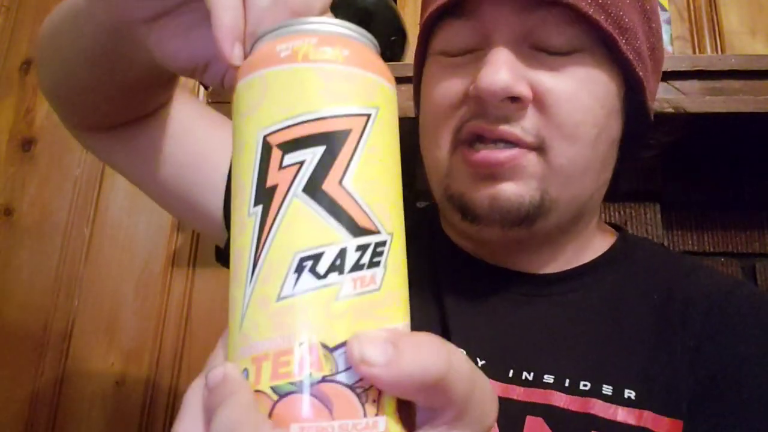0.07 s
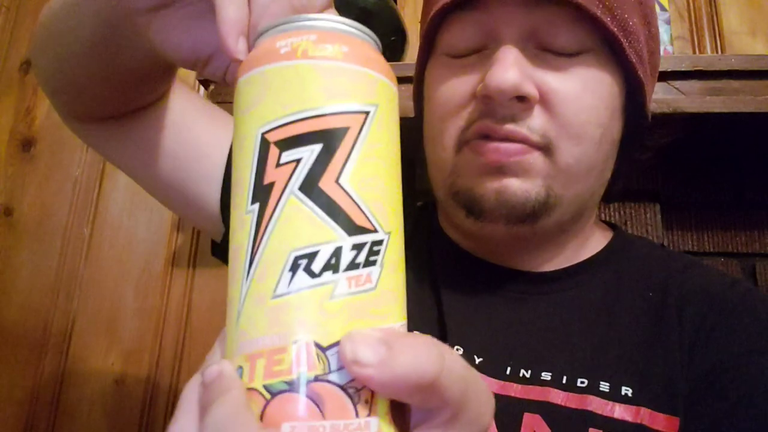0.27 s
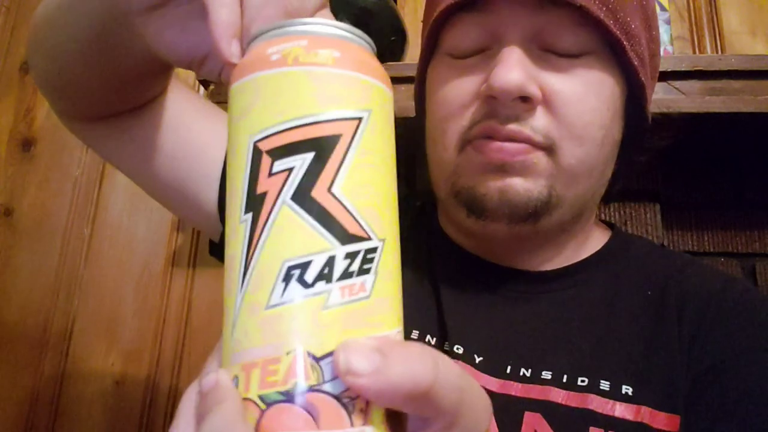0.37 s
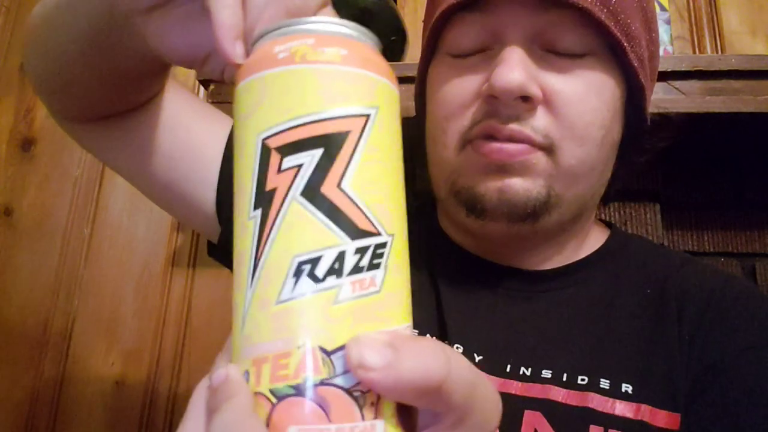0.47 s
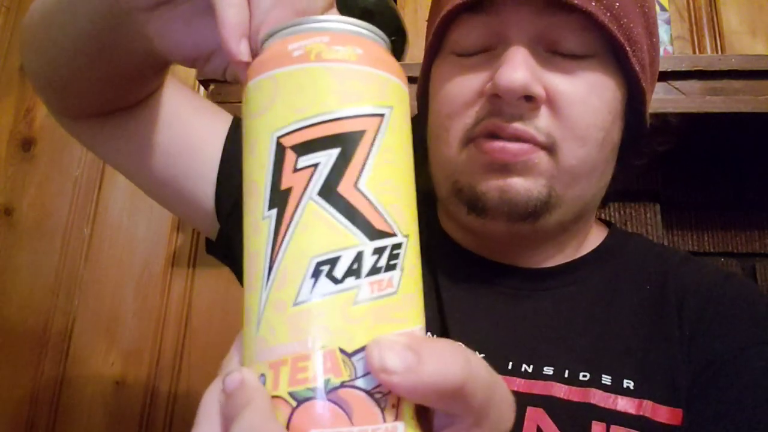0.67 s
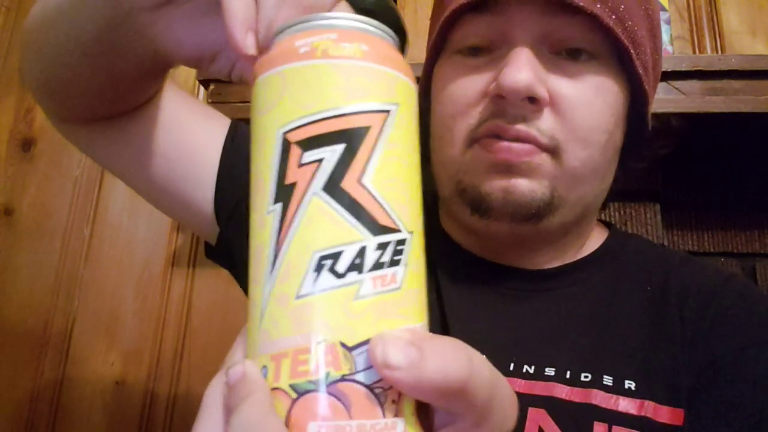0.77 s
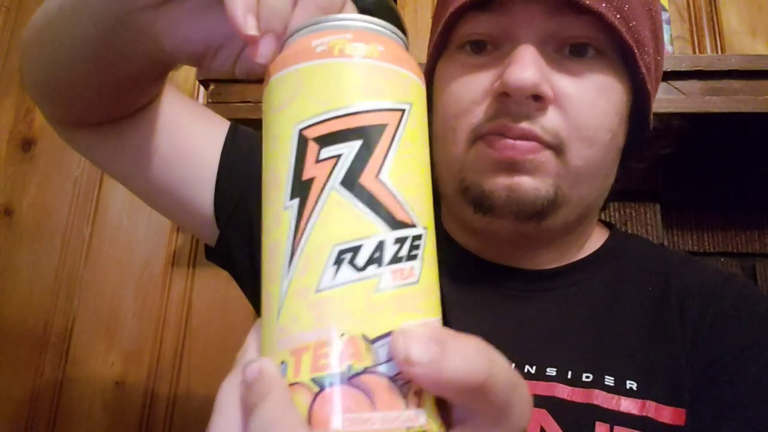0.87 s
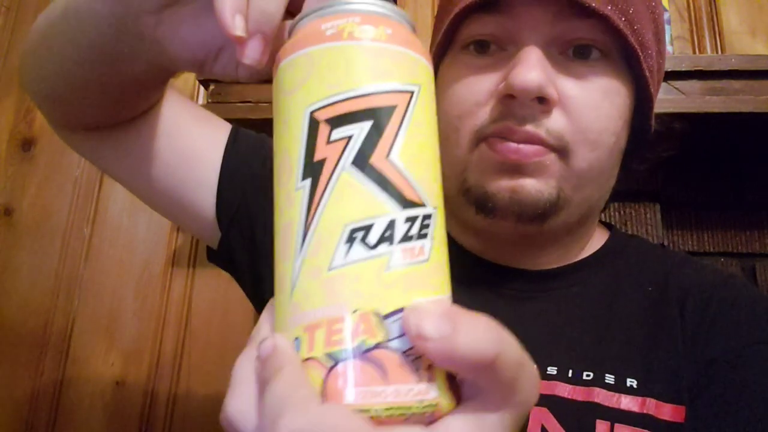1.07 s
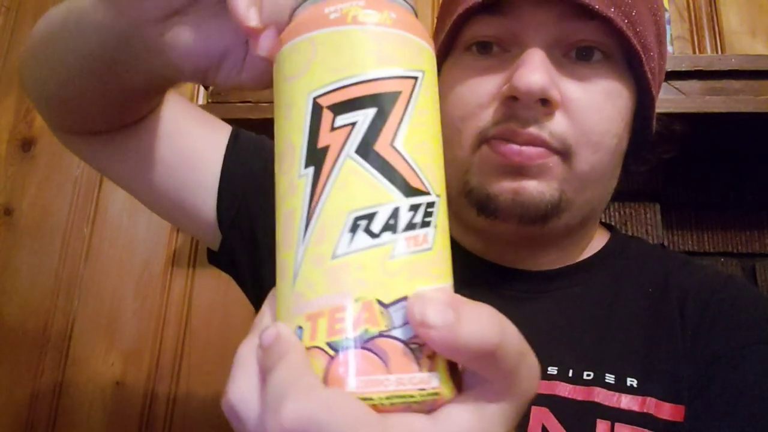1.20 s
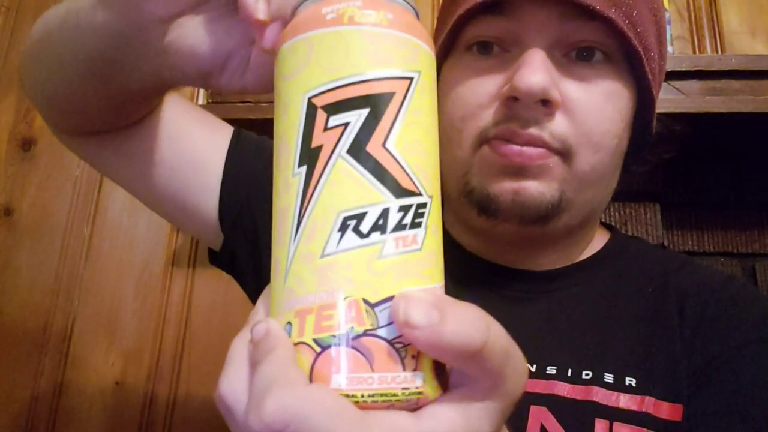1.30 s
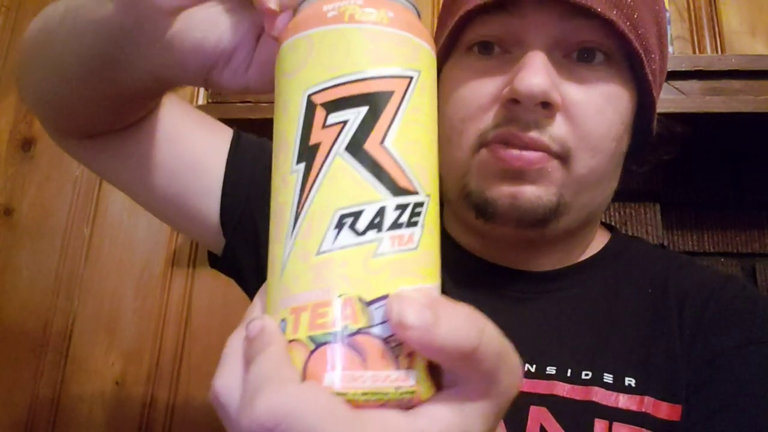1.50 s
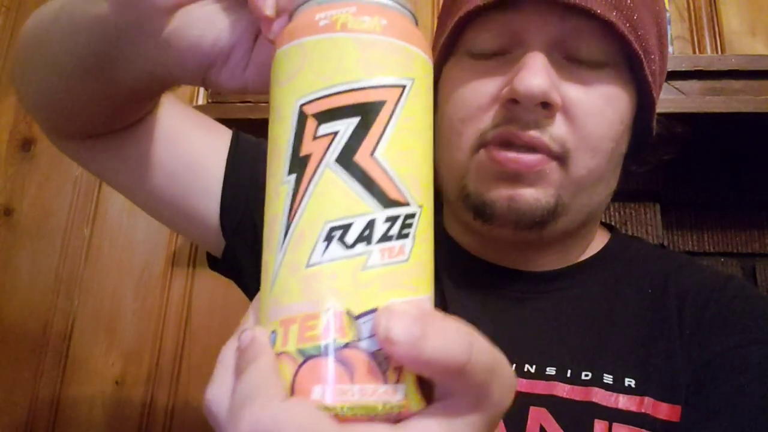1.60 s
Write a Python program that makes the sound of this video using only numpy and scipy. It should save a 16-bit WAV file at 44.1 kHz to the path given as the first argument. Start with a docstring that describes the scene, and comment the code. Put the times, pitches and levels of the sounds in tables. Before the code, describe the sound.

A fingernail flicks the metal pull tab of a full drink can close to stereo microphones: one bright, hard snap almost at once, a tiny tick, then a softer double click near the end, in a small quiet wooden room.

```python
"""The metal pull tab of a full drink can, flicked by a fingernail, snaps close to two microphones in a small wooden room.
Each snap is a sharp impulse plus a brief noisy chatter of the tab on the lid, with the ringing of can and tab.
Delayed copies make the echoes of near surfaces and walls; fading noise makes a room tail of about a third of a second.
The left microphone favours 5 kHz, the right one 13 kHz. A faint whistle, a wavering low hum and room noise lie below,
all made of filtered noise."""
import sys
import numpy as np
from scipy import signal
from scipy.fft import rfft, irfft
from scipy.io import wavfile
from scipy.ndimage import uniform_filter1d

SR = 44100
rng = np.random.default_rng(int(sys.argv[2]) if len(sys.argv) > 2 else 0)


def how_loud(loudness_db):
    """Turn decibels into a plain amplitude multiplier (0 dB gives 1, 20 dB gives 10)."""
    steps = np.asarray(loudness_db, float) / 20
    return 10 ** steps


def master(y):
    """Save y as 16-bit WAV."""
    cut = np.clip(np.atleast_2d(y).T, -1, 1)
    pcm = np.round(cut * 32767)  # scale
    wavfile.write(sys.argv[1], SR, pcm.astype(np.int16))


N = 72765   # length of the sound [samples]

# pitches at which the colour of each snap is given: (frequency [Hz])
SNAP_HZ = [750, 1500, 3000, 5500, 9000, 13000, 15500]
# snaps of the tab, levels before the common gain:
# (time [s], level [dB], seven colours at SNAP_HZ [dB], chatter [dB], can ring [dB], room tail [dB])
SNAPS = [(0.0185, -59.5, -6, 5, 18, 2.5, -20, -26, -19, -15, -10, 4),
         (0.1896, -27.5, 0, 13.5, 1.5, -2, -1, -13.5, -27, -3.5, -6.5, -13),
         (0.2034, -3, -10, -17.5, -13, -13.5, 2, -1, -4.5, 0.5, -9, 0),
         (0.2038, -1, -1.5, 1, -1.5, 0, -11.5, -21.5, -20, -9.5, -25, -1.5),
         (0.2044, -14.5, -3.5, 0.5, 0, -5.5, -1, 0, 0, -6, -26, -22),
         (.6295, -67, 0, -3.5, 5, 9, -16, -25, -25, -1, -18, 10.5),
         (.8135, -22, 16.5, 7, 8, -8.5, -5, -28.5, -26, 2.5, -29.5, 1),
         (1.0178, -61, 15, 33, 2, -15, -15, -25.5, -24.5, -14.5, -30, 16),
         (1.4772, -60, -1, -5.5, 1.5, 1.5, 8, 6, 16, 1, -30.5, 6.5),
         (1.5293, -64, 0, 7.5, 0, 3, 0, -23, -25, -8, -30, 4),
         (1.5808, -64.5, 5.5, -4.5, 20, 4, 2, -10, -17, -12, -35, -12),
         (1.5940, -22.5, 3, 1.5, 7, -0.5, 10.5, -10, -5, 1, -36, 4),
         (1.5952, -24, 4, 10, 4, -4.5, 10, -4, -16, -8, -30, -5),
         (1.5995, -36, 4, 13, -1, 0, 10, -3, -12, -15, -8, -4),
         (1.6006, -34, 11, 6, -3, 3, 6, -10, -10, -4.5, 0, 1)]
# ringing of can and tab: (frequency [Hz], relative level [dB], time to fall by 60 dB [s])
CAN_RINGS = [(746.6, -28, .08), (800, -28, .06), (1660, -25.5, 0.013), (4456, -22, 0.025), (4600, -23, .03),
             (4950, -24, .03)]
# colour of each microphone: (frequency [Hz], left [dB], right [dB])
MICS = [(198.1, -49, -57.5), (700, -25, -40), (1360, -24.5, -39.5), (2200, -21, -36), (3020, -15.5, -27.5),
        (3850, -7, -20.5), (4920, -1.5, -15.5), (5300, 4, -20.5), (6200, -8, -35.5), (7600, -17, -35),
        (8320, -28, -33.5), (10550, -20, -17), (11420, -16.5, -11), (13060, -16.5, -4.5),
        (13800, -13.5, -6.5), (15160, -22.5, -8), (17000, -38.5, -32)]
# echoes from hand, lid, desk and walls, against the direct sound: (delay [s], left [dB], right [dB])
ECHOES = [(.0006, -12, -12), (.0011, -15, -12), (.0016, -17, -14), (.0023, -18, -20), (.0071, -13, -10),
          (.0085, -16, -15), (.0104, -18, -17), (.0145, -21, -15)]
# room tail by band: (frequency [Hz], relative left [dB], relative right [dB], time to fall by 60 dB [s])
ROOM_TAIL = [(500, -30.5, -26, .3), (1413, -28, -24.5, 0.21), (2500, -26, -25.5, .32),
             (3610, -31, -28, .34), (4800, -32.5, -31, 0.35), (6230, -33.5, -22.5, 0.3),
             (8700, -32, -23, .27), (11000, -33, -29, 0.28), (13500, -30, -30.5, 0.17),
             (16000, -37.5, -35, .2)]
# faint whistle, a band of noise: (frequency [Hz], width [Hz], level before the swell [dB])
WHISTLE = (1620, 90, -81)
# when the whistle sounds: (start [s], length [s])
WHISTLE_TIME = (.06, .13)
# two bands of hum: (frequency [Hz], width [Hz], left minus right [dB], left-right likeness [-1 to 1])
HUM_BANDS = [(58.3, 19, 6, .9), (138, 48, 8.5, 0.76)]
# wavering of the hum: (time [s], lower band [dB], upper band [dB])
HUM_LEVELS = [(0.0, -80, -71), (0.064, -67, -69.5), (0.128, -80.5, -87), (0.288, -62, -68.5),
              (0.34, -64, -74), (0.458, -57, -66.5), (0.642, -68.5, -78), (0.738, -60.5, -78),
              (0.776, -72.5, -75.5), (0.808, -69.5, -88.5), (0.946, -65.5, -68.5), (1.53, -71.5, -72.5),
              (1.626, -64, -73), (1.65, -73.5, -87)]
# colour of room noise and microphone hiss: (frequency [Hz], relative level per Hz [dB])
AIR_COLOUR = [(20, -24), (35, -12), (60, -6.5), (90, -10), (146, -7.5), (232, -13.5), (400, -20),
              (700, -22.5), (950, -19), (1300, -24), (1750, -28.5), (2250, -22.5), (3000, -30.5),
              (4500, -34.5), (6300, -37.5), (8600, -44.5), (10500, -36.5), (12000, -31.5), (15500, -32.5),
              (16200, -51)]
# slow change of the room noise: (time [s], added level [dB])
AIR_LEVEL = [(0.0, 2), (1.65, 0)]
# side to which the room noise leans: (frequency [Hz], left minus right [dB])
AIR_LEAN = [(60, 3.5), (110, 6), (200, 8.5), (380, 5.5), (700, 4), (1290, 11.5), (2380, 11), (4400, 11),
            (8120, 0.5), (15000, 3)]
# how alike the room noise is in both channels: (frequency [Hz], left-right likeness [-1 to 1])
AIR_LIKENESS = [(60, 0.32), (180, 0.85), (550, 0.47), (1650, -0.09), (4970, 0.51), (15000, -0.081)]


def tab_snaps(size):
    """Spectra of all snaps: impulse plus chatter close by, blurred into one blow for the room tail."""
    hz = frequencies(size)
    ring, bright = can_ring(hz), chatter_colour(hz)
    near, far = 0, 0
    for s, db, *colour, chatter_db, ring_db, tail_db in SNAPS:
        colour_db = at_hz(np.transpose([SNAP_HZ, colour]), hz)
        impulse = how_loud(db) * causal(colour_db) * delay(hz, s)
        blow = impulse * (1 + how_loud(ring_db) * ring)
        chatter = bright * rfft(how_loud(chatter_db) * chatter_noise(), size)
        near = near + blow * (1 + chatter)
        # the blurred blow adds the powers of impulse and chatter
        blurred = np.sqrt(1 + how_loud(2 * chatter_db) * abs(bright) ** 2)
        far = far + how_loud(tail_db) * blow * blurred
    return near, far


def chatter_noise():
    """The tab rattles on the lid: a tiny burst of noise that holds, then fades fast."""
    hold_s, fade_s = .0014, .0002
    t = np.arange(256) / SR
    shape = np.exp(-np.maximum(t - hold_s, 0) / fade_s) / np.sqrt(hold_s * SR)
    return shape * rng.standard_normal(len(t))


def chatter_colour(hz):
    """Light metal contacts favour the treble: a gentle high-pass around 9000 Hz, doubled in strength."""
    corner_hz = 9000
    return (1j * hz / (corner_hz + 1j * hz)) ** 2 * 2


def can_ring(hz):
    """Can and tab ring as decaying sine waves, each one a two-pole resonator."""
    one_sample = np.exp(-2j * np.pi * hz / SR)
    ring = 0
    for centre, db, t60 in CAN_RINGS:
        decay = how_loud(-60 / (t60 * SR))   # per sample
        turn = 2 * np.pi * centre / SR
        below = 1 - 2 * decay * np.cos(turn) * one_sample + (decay * one_sample) ** 2
        ring = ring + how_loud(db) * np.sin(turn) * one_sample / below
    return ring


def room(size):
    """Surfaces return single echoes, then a noise-like tail; both pass through the two microphones."""
    hz = frequencies(size)
    early = 1   # the direct sound
    for s, left_db, right_db in ECHOES:
        early = early + how_loud(np.array([[left_db], [right_db]])) * delay(hz, s)
    mics = np.array([causal(at_hz(MICS, hz, axis=k)) for k in (1, 2)])
    return early * mics, rfft(room_tail(), size) * mics


def room_tail():
    """Many mixed reflections sound like noise, here dying away at its own rate in each band."""
    build_s = .006
    t = np.arange(SR // 2) / SR
    hz = frequencies(len(t))
    white = rfft(rng.standard_normal((2, len(t))))
    centres = np.array(ROOM_TAIL)[:, 0]
    tail = 0
    for k, (_, left_db, right_db, t60) in enumerate(ROOM_TAIL):
        # each band fades into its neighbours
        share = at_hz(np.transpose([centres, np.arange(len(centres)) == k]), hz)
        band = irfft(white * share, len(t))
        tail = tail + band * how_loud(np.array([[left_db], [right_db]]) - 60 * t / t60)
    return tail * (1 - np.exp(-(t / build_s) ** 2))


def whistle():
    """Noise in a narrow band has a pitch; this one swells and fades once."""
    (start, length), (centre, width, db) = WHISTLE_TIME, WHISTLE
    hz, t = frequencies(N), np.arange(N) / SR
    noise = pair(alike=0.56, lean_db=6.4)
    band = irfft(noise / (1 + (2 * (hz - centre) / width) ** 2), N)
    swell = np.sqrt(np.sin(np.pi * np.clip((t - start) / length, 0, 1)) + 1e-12)
    return how_loud(db) * rms_one(band) * swell


def hum():
    """Two narrow bands of low noise, evened out and then given a wavering level."""
    hz, out = frequencies(N), 0
    for (centre, width, lean_db, alike), db in zip(HUM_BANDS, in_time(HUM_LEVELS)):
        band = irfft(pair(alike, lean_db) / (1 + (2 * (hz - centre) / width) ** 4), N)
        local_power = uniform_filter1d(band.mean(axis=0) ** 2, size=3000)
        # a small constant share keeps the quiet gaps from being raised too far
        swell = np.sqrt(local_power + .1 * np.mean(band ** 2))
        out = out + how_loud(db) * band / swell
    return out


def air():
    """Room noise and hiss: coloured noise whose likeness and lean between left and right vary with pitch."""
    level_db = -74.5 + in_time(AIR_LEVEL)[0]
    hz = frequencies(N)
    noise = pair(at_hz(AIR_LIKENESS, hz), at_hz(AIR_LEAN, hz))
    coloured = irfft(noise * how_loud(at_hz(AIR_COLOUR, hz)), N)
    return how_loud(level_db) * rms_one(coloured)


def frequencies(size):
    """Frequencies [Hz] in the spectrum of a sound of this many samples."""
    return np.arange(size // 2 + 1) * SR / size


def delay(hz, s):
    """Spectrum of a pure delay: a later start turns the phase more at higher pitches."""
    return np.exp(-2j * np.pi * hz * s)


def in_time(rows):
    """Columns of a curve, one value per sample."""
    s, *columns = np.transpose(rows)
    return [np.interp(np.arange(N) / SR, s, c) for c in columns]


def at_hz(rows, hz, axis=1):
    """One column of a table, read on a log-frequency axis."""
    rows = np.array(rows)
    return np.interp(np.log(np.maximum(hz, 1)), np.log(rows[:, 0]), rows[:, axis])


def causal(db):
    """Minimum-phase response of a level curve [dB]: nothing rings early."""
    c = irfft(db * np.log(10) / 20)
    # fold the part before time zero onto the part after it
    c[1:len(c) // 2] *= 2
    c[len(c) // 2 + 1:] = 0
    return np.exp(rfft(c))


def pair(alike, lean_db):
    """Spectra of two partly alike white noises, leaning to one side: a shared part plus an opposed part."""
    mid, side = rfft(rng.standard_normal((2, N)))
    alike = np.clip(alike, -1, 1)
    shared = np.sqrt(1 + alike) * mid
    opposed = np.sqrt(1 - alike) * side * [[1], [-1]]
    return (shared + opposed) * how_loud(lean_db * np.array([[.5], [-.5]]))


def rms_one(x):
    """Scaled so that the mean of the channels has an rms of 1."""
    return x / np.sqrt(np.mean(x.mean(axis=0) ** 2) + 1e-20)


def scene():
    """Snaps in the room over the background."""
    size = 2 ** 17   # longer than N, so that late sound does not wrap round to the start
    near, far = tab_snaps(size)
    early, tail = room(size)
    snaps = irfft(near * early + far * tail, size)[:, :N]
    return how_loud(14.5) * snaps + whistle() + hum() + air()


def roll_off(x):
    """The treble ends steeply here."""
    return signal.sosfilt(signal.butter(12, 16620, fs=SR, output="sos"), x)


def record(dry):
    """A steep low-pass takes away the top of the treble to finish the mix."""
    cutoff_hz = 16600
    low_pass = signal.cheby2(12, 70, cutoff_hz, fs=SR, output="sos")   # 70 dB down from the cutoff on
    mix = signal.sosfilt(low_pass, dry)
    return roll_off(mix)


dry = scene()
out = record(dry)
master(out)
```